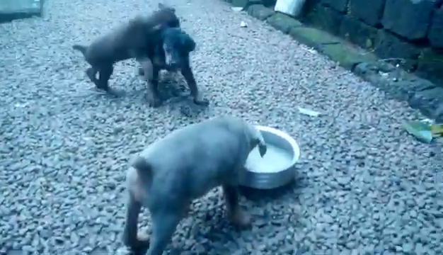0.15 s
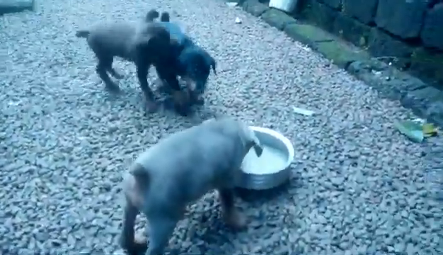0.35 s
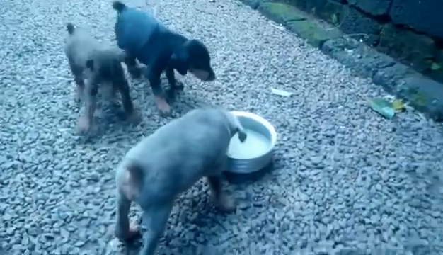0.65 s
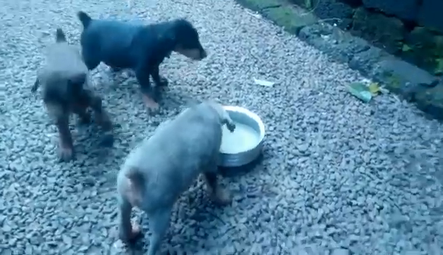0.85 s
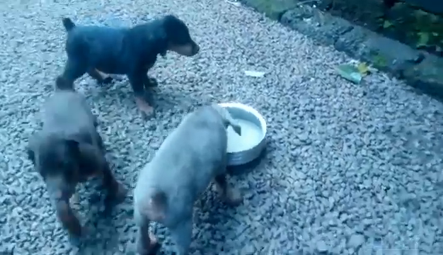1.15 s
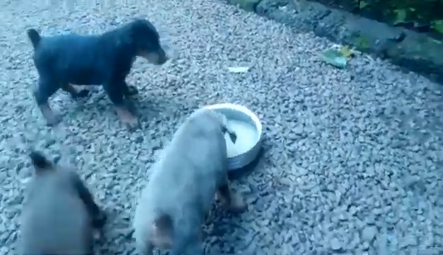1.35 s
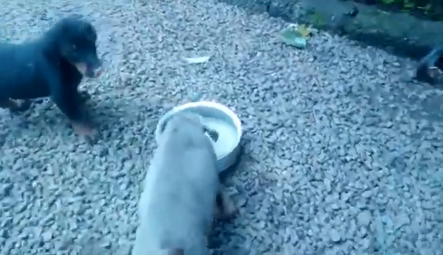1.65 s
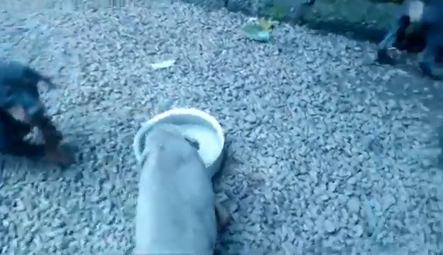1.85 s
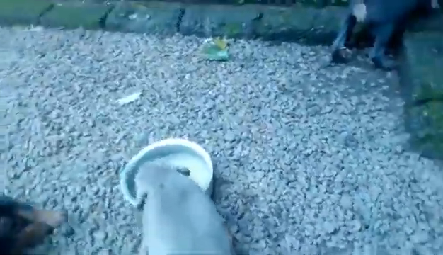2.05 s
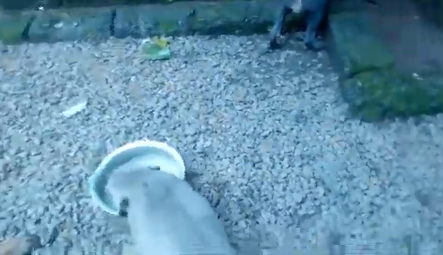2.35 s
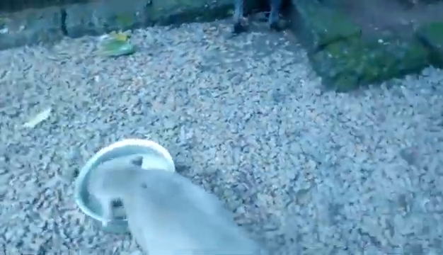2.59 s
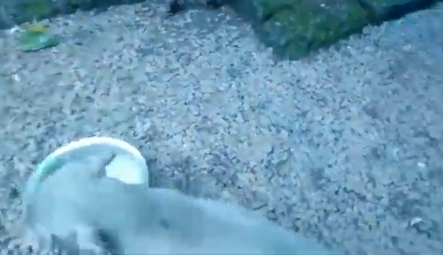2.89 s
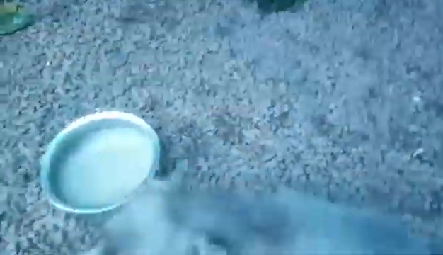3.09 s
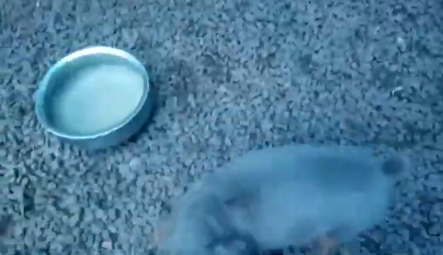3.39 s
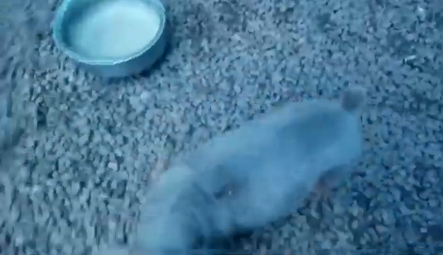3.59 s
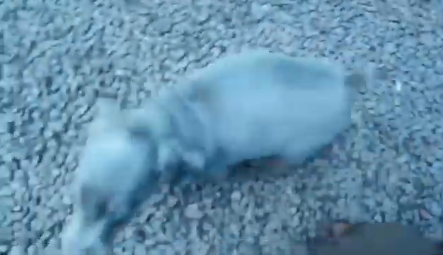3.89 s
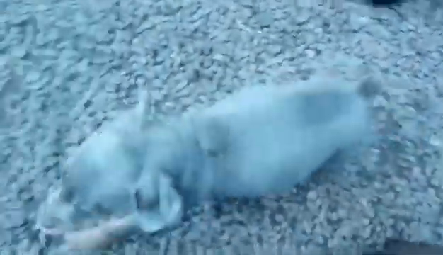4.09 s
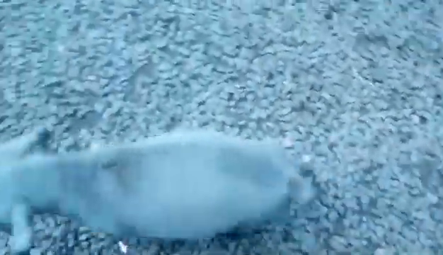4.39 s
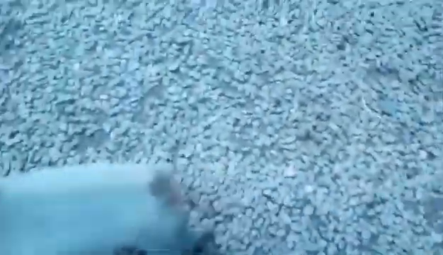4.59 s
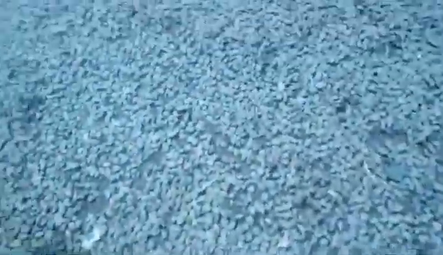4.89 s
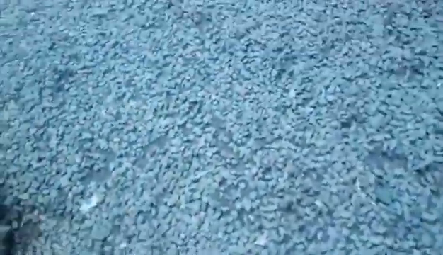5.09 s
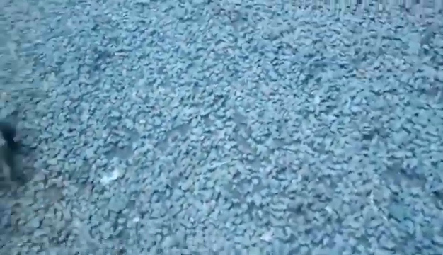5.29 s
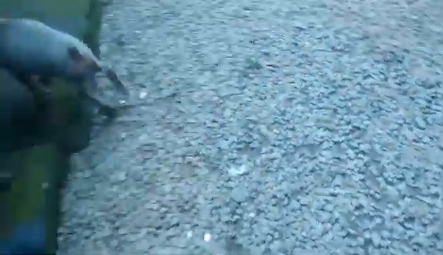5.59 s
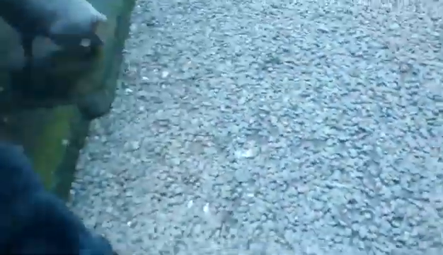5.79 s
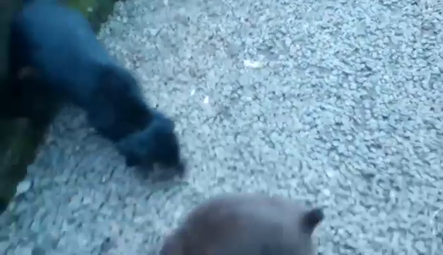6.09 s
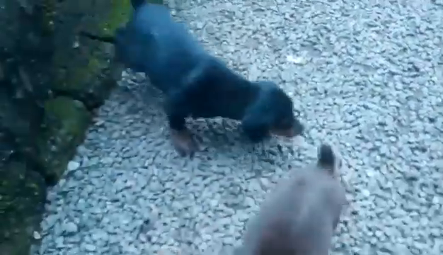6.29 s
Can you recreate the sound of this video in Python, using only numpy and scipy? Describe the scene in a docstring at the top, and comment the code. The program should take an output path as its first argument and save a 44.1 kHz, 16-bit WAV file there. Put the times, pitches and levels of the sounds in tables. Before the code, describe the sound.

In a small walled yard, a puppy cries over and over, sharp high yelps alternating with thin whimpers, and ends on a croaky falling whine. The voice sits left of the microphone with a brief echo. Throughout, gravel rubs, ticks and crunches quietly under shifting paws and shoes, busier from the middle on, with soft thudding steps. A barely audible hum and outdoor air lie behind.

```python
"""A puppy yelps again and again, off to the left in a small walled yard: sharp cries sliding into whines.
Its vocal folds sing a near-pure tone that cracks upward and turns rough as they beat unevenly.
Paws and shoes shuffle on gravel: small stones rub, click and crunch, and footfalls thud softly.
The walls throw the yelps back, over faint outdoor air and an unsteady hum."""
import sys
import numpy as np
from scipy import signal
from scipy.fft import rfft, irfft, next_fast_len
from scipy.io import wavfile

SR = 44100
rng = np.random.default_rng(int(sys.argv[2]) if len(sys.argv) > 2 else 0)


def inscribe(sig):
    """Save sig as 16-bit PCM at rate SR to the path in sys.argv[1].

    A 1-D sig is mono; a 2-D sig holds one channel per row.
    Samples are clipped to [-1, 1] before scaling.
    """
    pcm = np.round(np.clip(np.atleast_2d(sig).T, -1, 1) * 32767)
    wavfile.write(sys.argv[1], SR, pcm.astype(np.int16))


N = 284445
TIME = np.arange(N) / SR

# the bright tone colour of gravel: freq_hz, gain_db
GRAVEL_EQ = [(300, -41.5), (900, -19.5), (1500, -17), (3000, -17), (5000, -11), (7500, -5.5), (10300, -1.5),
             (11300, -11.5), (12000, -20.5), (14500, -23.5), (16000, -50)]


def puppy(direct_db=-1, echo_db=-11, scatter_db=-8, wall_db=-15, right_echo_db=2, right_lag_s=0.0002):
    """The yelps arrive straight, off the ground and two near walls, and as the yard's echo."""
    # loud cries, cued on the upward crack: crack_s, lead_s, attack_s, hold_s, start_hz, jump_hz, top_hz,
    # sag_hz_per_s, fall_hz_per_s, fundamental_db, second_db, overtone_db, tilt_db_per_octave, roughness
    cries = [(0.301, .058, 0.031, 0.096, 750, 29.6, 1002, 493, 4740, -12, -22, -16, 5.5, 0.32),
             (0.605, 0.071, .019, 0.095, 778, 50.4, 1005, 388, 3210, -6.5, -22.5, -13.5, -1, 0.09),
             (1.172, 0.061, 0.0055, .048, 676, 140.3, 980.5, 1614, 320, -11, -25, -25, -5, 1.06),
             (1.954, 0.048, 0.0017, 0.073, 676, 185, 1032, 1740, 299, -12, -27.5, -25.5, -15, 1),
             (2.891, 0.055, 0.0047, 0.074, 767, 92.2, 990, 1110, 890, -13, -24, -25, 0.5, 1.06),
             (3.129, 0.081, 0.019, 0.093, 799, 124.7, 971.4, 599, 2630, -10, -20.5, -21.5, -3, 0.43),
             (3.659, .063, 0.017, 0.085, 714, 147.7, 993.5, 1328, 710, -16.5, -25.5, -24.5, 11, 1.05),
             (4.373, 0.044, 0.0055, 0.083, 764, 109, 1003, 974, 500, -13, -28.5, -24.5, 4, 0.84),
             (4.939, 0.053, 0.0089, 0.084, 818, 66, 987.4, 750, 197, -13.5, -25, -22, 2, 0.63),
             (5.467, 0.051, 0.013, 0.087, 800, 73.8, 993, 647, 903, -10, -22, -17.5, 0.5, 0.27),
             (6.027, 0.06, 0.018, 0.061, 766, 69.2, 974, 651, 727, -9, -25.5, -19.5, 1.5, 0.33)]
    # softer whines between and after them: start_s, length_s, first_hz, last_hz, arch_hz,
    # fundamental_db, second_db, overtone_db, tilt_db_per_octave, croak (0-1)
    whines = [(0.770, 0.08, 800, 766, -2.5, -49, -46, -39.5, 0, 0),
              (0.836, 0.077, 779, 754.5, 10, -32, -40.5, -22.5, 20, 0.13),
              (1.265, .075, 855, 833, -1.5, -33, -41, -46.5, -14, 0.1),
              (1.332, 0.16, 844, 849.2, 85.5, -5, -35.5, -31, -7, 0.51),
              (1.562, 0.15, 793.3, 785, 2, -22.5, -37, -40, 3, 0.12),
              (2.117, 0.084, 786, 807, 5, -31.5, -30, -30, -7, 0.43),
              (2.166, 0.12, 780.5, 807, 48, -13, -32.5, -34.5, 0, 0.23),
              (2.295, .1, 799, 775, -9.5, -20, -40, -44, -44, 0),
              (2.408, 0.19, 783.7, 771, 15, -23, -35.5, -38, -30, 0.23),
              (2.575, 0.064, 755.4, 750, 6.5, -38, -35, -38.5, 22.5, 0),
              (3.246, 0.13, 805, 750, 9, -25, -37.5, -29.5, -7, 0),
              (3.785, 0.13, 779, 790, -7, -29.5, -41, -33, -5, 0),
              (3.884, 0.23, 821.6, 772, 32.5, -26, -26.5, -27, 12, 0.75),
              (4.524, 0.18, 817, 766, 10.5, -36, -45.5, -47, 19, 0.77),
              (5.095, 0.097, 862.5, 819, 5, -25.5, -49, -64, -2, 0.2),
              (5.638, 0.16, 823, 769, 4, -31.5, -50, -48, -3, 0.44),
              (6.166, 0.17, 811, 693, 2, -27.5, -45, -47.5, 13, 1)]
    # shading of the voice on the far, right side: freq_hz, gain_db
    far_side_eq = [(800, -19.5), (1100, -16), (1800, -8.5), (3000, -7), (6000, -11.5)]
    voice = np.zeros(N)
    for row in cries:
        add(voice, *cry(*row))
    for row in whines:
        add(voice, *whine(*row))
    echo = amp(echo_db) * yard(voice) + amp(scatter_db) * ground_scatter(voice)
    # the gliding pitch beats with its own reflections
    for channel, delays_s in enumerate([(0.023, 0.047), (0.0068, 0.066)]):
        for delay_s in delays_s:
            add(echo[channel], delay_s, amp(wall_db) * voice)
    direct = amp(direct_db) * colour(voice, [(1100, 0), (2500, -4)])
    late = np.interp(TIME - right_lag_s, TIME, direct)
    right = colour(late + amp(right_echo_db) * echo[1], far_side_eq)
    return np.array([direct + echo[0], right])


def cry(crack_s, lead_s, attack_s, hold_s, start_hz, jump_hz, top_hz, sag_hz_per_s, fall_hz_per_s,
        fundamental_db, second_db, overtone_db, tilt, roughness):
    """A cry swells and climbs, cracks up to its top pitch, sags while held, then falls away."""
    jump_s, opening_s, rest_hz = 0.0141, 0.045, 750
    crack_onset_s, crack_heal_s = 0.024, 0.07
    release_db_per_s, upper_release_db_per_s, overtone_fade_db_per_s = 362, 245, 49.5
    t = np.arange(round(0.42 * SR)) / SR - lead_s  # zero at the crack
    held, released = np.maximum(t, 0), np.maximum(t - hold_s, 0)
    before_jump = 1 - np.clip(t / jump_s, 0, 1)
    climb_hz = (top_hz - jump_hz - start_hz) * np.maximum(-t / lead_s, 0) ** 1.4  # still to climb
    falling_hz = np.maximum(top_hz - sag_hz_per_s * held - fall_hz_per_s * released, rest_hz)
    hz = falling_hz - jump_hz * before_jump - climb_hz
    crack = roughness * np.exp(-(t / np.where(t < 0, crack_onset_s, crack_heal_s)) ** 2)
    swell_db = -24 * np.exp(-(t + lead_s) / attack_s)
    upper_db = swell_db - upper_release_db_per_s * released
    duck_db = -6.5 * before_jump  # the lowest two harmonics leap out with the jump
    effort_db = 3.5 * (np.sin(np.pi * np.minimum(held / hold_s, 1) ** 0.7) - 0.5)
    # the fundamental is weak while the pitch is still below the mouth's resonance
    fundamental_db += swell_db + duck_db + effort_db - 0.19 * climb_hz - release_db_per_s * released
    second_db += upper_db + duck_db
    # the crack throws extra power into the overtones
    overtone_db += upper_db - overtone_fade_db_per_s * held + 4.5 * crack + 0.5 * before_jump
    # they brighten in the crack and as the mouth opens
    tilt += 8.5 * crack - 11.5 * np.exp(-(t + lead_s) / opening_s)
    return crack_s - lead_s, folds(crack_s - lead_s, hz, fundamental_db, second_db, overtone_db, tilt, crack)


def whine(start_s, length_s, first_hz, last_hz, arch_hz,
          fundamental_db, second_db, overtone_db, tilt, croak):
    """A whine glides through one shallow arch and may end in a croak, where the slack folds drop in pitch."""
    attack_s, release_db_per_s = 0.0067, 571
    croak_s, croak_drop_hz = 0.048, 35
    t = np.arange(round(0.42 * SR)) / SR
    progress = np.minimum(t / length_s, 1)
    hz = first_hz + (last_hz - first_hz) * progress + arch_hz * np.sin(np.pi * progress)
    fade_db = -21 * np.exp(-t / attack_s) - release_db_per_s * np.maximum(t - length_s, 0)
    crack = croak * np.exp(-((t - length_s) / croak_s) ** 2)
    fundamental_db += fade_db + 0.24 * (hz - hz.max())  # weaker as the pitch sinks from its top
    return start_s, folds(start_s, hz - croak_drop_hz * crack, fundamental_db,
                          second_db + fade_db, overtone_db + fade_db, tilt, crack)


def folds(start_s, hz, fundamental_db, second_db, overtone_db, tilt, crack):
    """The vocal folds: a near-pure tone with wavering overtones, torn by uneven cycles where it cracks."""
    # moments when the folds beat strong-weak: centre_s, length_s, depth_db
    splits = [(0.602, 0.051, -43), (0.954, 0.017, 6), (1.16, 0.031, 0), (3.222, 0.059, -12.5),
              (4.128, 0.047, -20)]
    # resonance of throat and mouth: freq_hz, gain_db
    throat_eq = [(2100, -4.5), (2400, -0.5), (2900, 3), (3300, -3.5), (3800, -2.5), (4300, -8.5),
                 (4800, -14.5), (5600, -24.5), (7500, -37.5), (10000, -31)]
    jitter, shimmer, flicker_db, rasp_db = 0.0251, 0.42, 4.5, -7
    hoarseness, loud_db = 0.14, -20.5
    t = start_s + np.arange(len(hz)) / SR
    # loud stretches are a little hoarse, cracks very much so
    rough = abs(hoarseness * np.sqrt(amp(overtone_db - loud_db)) + crack)
    # strained folds beat unevenly, in period and in strength
    hz = hz * (1 + 0.0045 * wander(len(t), 35))
    phase = 2 * np.pi * np.cumsum(hz * (1 + jitter * rough * wander(len(t), 100))) / SR
    strength = np.exp(shimmer * rough * wander(len(t), 48.7))
    # lip shape tilts the overtones, in dB per octave
    orders = np.arange(3, 12)[:, None]
    throat = amp(read(throat_eq, orders * hz) + tilt * np.log2(np.minimum(orders, 4.3)))
    throat /= np.linalg.norm(throat, axis=0)
    # the shape of each cycle varies, so every overtone flickers and smears by itself
    flicker = np.array([unit(amp(flicker_db * wander(len(t), 26))) for _ in orders])
    smear = (0.08 + 1.05 * rough) * np.array([wander(len(t), 110) for _ in orders])
    overtones = amp(overtone_db) * (throat * flicker * np.sin(orders * phase + smear)).sum(0)
    upper = amp(second_db) * np.sin(2 * phase + smear[-1] / 3) + overtones
    # alternate strong and weak cycles put tones halfway between the harmonics
    split = sum(amp(db) * np.exp(-(2 * (t - centre_s) / length_s) ** 2) for centre_s, length_s, db in splits)
    halves = split * amp(fundamental_db) * np.sin(1.5 * phase + smear[-2] / 2)
    halves += np.minimum(split, 0.5) * upper * np.cos(phase / 2)
    tone = np.sqrt(2) * (amp(fundamental_db) * np.sin(phase) + upper + halves)
    # air rushes through the folds once a cycle
    puffs = rng.standard_normal(len(t)) * (1 + 0.6 * np.cos(phase))
    rasp = unit(colour(puffs, [(500, -29), (900, -15.5), (1550, 0.5)] + throat_eq))
    voice = strength * tone + amp(overtone_db + rasp_db) * np.sqrt(rough) * rasp
    # so small a throat radiates less below its pitch
    return colour(voice * signal.windows.tukey(len(t), 0.03), [(450, -4), (720, -2)])


def gravel(grains_per_s=950, spread_db=4.8, tick_s=0.0008, hiss_db=-9, clump_db=4, level_db=1):
    """Countless small stones rub and tick, in clumps, as feet shift."""
    tick_kinds = 24
    t = np.arange(200) / SR
    sizes = amp(spread_db * np.minimum(rng.exponential(1, N), 4))
    grains = sizes * (rng.random(N) < grains_per_s / SR)
    kind = rng.integers(0, tick_kinds, N)
    ticks = np.zeros((2, N))
    for k in range(tick_kinds):
        tick = rng.standard_normal((2, len(t))) * np.exp(-t / tick_s)
        ticks += signal.oaconvolve((grains * (kind == k))[None], tick, axes=1)[:, :N]
    hiss = amp(hiss_db) * rng.standard_normal((2, N))
    grit = unit(colour(unit(ticks) + hiss, GRAVEL_EQ))
    effort = shuffling() * unit(amp(clump_db * wander(N, 31)))
    return pan(grit * effort * amp(level_db), right_db=-5)


def shuffling(attack_s=0.011, ease_db_per_s=6, settle_db_per_s=225.5, bed_db=-51):
    """The gravel's envelope: each scuff bites, eases as the foot slides and settles into a restless bed."""
    # feet pushing through the gravel: start_s, length_s, level_db
    scuffs = [(0.0, 0.02, -30.5), (0.043, 0.055, -29.5), (0.195, .2, -36), (0.502, 0.017, -31.5),
              (0.603, 0.041, -39.5), (0.905, 0.12, -45), (1.068, 0.14, -43.5), (1.276, 0.086, -33.5),
              (1.454, 0.024, -31.5), (1.621, .05, -31.5), (1.923, 0.31, -31.5), (2.339, 0.071, -38.5),
              (2.487, 0.16, -43.5), (2.639, 0.042, -32), (2.745, 0.29, -31), (2.781, 0.056, -26),
              (3.057, 0.2, -35.5), (3.25, .15, -34.5), (3.484, 0.083, -35.5), (3.663, 0.045, -37),
              (3.779, 0.094, -30), (3.88, 0.08, -35.5), (4.05, 0.28, -36.5), (4.148, 0.015, -30),
              (4.355, 0.31, -39.5), (4.73, 0.012, -41), (4.87, 0.25, -38.5), (5.198, 0.038, -38),
              (5.448, 0.43, -35.5), (5.892, 0.22, -40), (6.149, 0.74, -35.5)]
    power, t = np.full(N, amp(bed_db) ** 2), np.arange(SR) / SR
    for start_s, length_s, db in scuffs:
        level_db = db - ease_db_per_s * t - settle_db_per_s * np.maximum(t - length_s, 0)
        add(power, start_s, (np.minimum(t / attack_s, 1) * amp(level_db)) ** 2)
    return np.sqrt(power)


def stones(gain_db=3, contact_s=0.0012):
    """A stone grates on another for a millisecond or two and rings at its own pitch."""
    # bright clicks of single stones: start_s, level_db, pitch_hz
    clicks = [(0.0525, -32, 10400), (1.0863, -29, 7800), (1.6482, -16.5, 8850), (1.683, -13.5, 8400),
              (2.6476, -22.5, 11220), (2.7347, -21, 10600), (2.784, -14.5, 10460), (2.827, -18, 10420),
              (2.997, -13, 9050), (3.4626, -17.5, 8000), (3.5484, -33, 10200), (3.8027, -14, 10700),
              (3.92, -16.5, 10440), (4.0632, -12.5, 10000), (4.1428, -17.5, 11300), (4.2552, -13.5, 9650),
              (4.4284, -15.5, 9900), (4.766, -23, 9600), (4.8332, -15.5, 8800), (5.5034, -11.5, 9660),
              (6.3083, -18, 10900)]
    # duller knocks: start_s, level_db, pitch_hz
    knocks = [(2.501, -25.5, 2740), (4.835, -36, 2720), (5.215, -24, 1800)]
    out, t = np.zeros((2, N)), np.arange(700) / SR
    for start_s, db, hz in list(clicks) + knocks:
        burst = rng.standard_normal((2, len(t))) * t * np.exp(-t / contact_s)
        ring_eq = [(hz / 3, -12), (hz * 0.8, -7), (hz, 0), (hz * 1.25, -5), (hz * 3, -46)]
        click = colour(colour(burst, GRAVEL_EQ), ring_eq)
        add(out, start_s, amp(db + gain_db) * click / abs(click).max(1, keepdims=True))
    return pan(out, right_db=-5)


def crunches(fade_s=0.0062):
    """Stones squeezed together give way in a brief burst that reaches the highest treble."""
    # sharp crunches under a foot: start_s, level_db
    hits = [(1.294, -20.5), (1.339, -13.5), (3.094, -15.5), (3.101, -8), (3.109, -18)]
    out, t = np.zeros((2, N)), np.arange(2000) / SR
    for start_s, db in hits:
        burst = rng.standard_normal((2, len(t))) * np.exp(-t / fade_s)
        crunch = colour(burst, [(2000, -4), (11000, 13), (15000, -3)])
        add(out, start_s, amp(db) * crunch / abs(crunch).max())
    return pan(out, right_db=-3)


def steps(gain_db=4, attack_s=0.00036, fade_s=0.039):
    """Each footfall pushes a soft, low thud out of the gravel bed."""
    # footfalls: start_s, level_db
    footfalls = [(0.145, -35.5), (0.66, -43.5), (1.338, -49), (2.262, -38.5), (2.357, -42), (2.594, -40),
                 (2.872, -40), (3.105, -37), (4.192, -41.5), (5.077, -49), (5.549, -34)]
    # the dull body of a thud: freq_hz, gain_db
    thud_eq = [(30, -29), (110, -11.5), (280, -8.5), (500, -17.5), (900, -12), (3000, -40)]
    out, t = np.zeros(N), np.arange(SR // 5) / SR
    envelope = (1 - np.exp(-t / attack_s)) * np.exp(-t / fade_s)
    for start_s, db in footfalls:
        thud = colour(rng.standard_normal(len(t)), thud_eq) * envelope
        add(out, start_s, amp(db + gain_db) * thud / abs(thud).max())
    return pan(out, right_db=-16)


def ground_scatter(x, fade_s=0.006):
    """Rough ground scatters the overtones for a few milliseconds, so they flare and fade as they glide."""
    t = np.arange(SR // 20) / SR
    spray = colour(rng.standard_normal((2, len(t))) * np.exp(-t / fade_s), [(1050, -20), (1700, 0)])
    return signal.fftconvolve(x[None], spray / np.linalg.norm(spray[0]), axes=1)[:, :N]


def yard(x, echoes_per_s=3000, build_s=0.0017):
    """Diffuse echo of stone walls, different on each side; treble dies first."""
    # the yard's reverb time: freq_hz, t60_s
    decay_times = [(700, 0.45), (970, 0.49), (1400, 0.46), (4000, 0.4), (10000, 0.27)]
    taps = rng.standard_normal((2, SR)) * (rng.random((2, SR)) < echoes_per_s / SR)
    hz, t, spectrum = signal.stft(taps, SR, nperseg=256)
    envelope = amp(-60 * t / read(decay_times, hz)[:, None]) * (1 - np.exp(-t / build_s))
    tail = signal.istft(spectrum * envelope, SR, nperseg=256)[1]
    return signal.fftconvolve(np.atleast_2d(x), tail / np.linalg.norm(tail[0]), axes=1)[:, :N]


def air(level_db=-58):
    """The still air of the yard: a faint, low wash of noise."""
    # tone colour of the outdoor air: freq_hz, gain_db
    air_eq = [(20, -6), (55, 1.5), (95, 4), (140, 2), (300, -8), (600, -8.5), (2000, -10.5), (10000, -66),
              (16000, -38.5)]
    return pan(amp(level_db) * unit(colour(rng.standard_normal((2, N)), air_eq)), right_db=-5)


def hum(pitch_hz=98, level_db=-63, swell_db=7, peak_s=2.7, width_s=0.71):
    """A faint hum, unsteady in pitch and level, that swells midway."""
    swell = np.exp(-((TIME - peak_s) / width_s) ** 2)
    level = amp(level_db + swell_db * swell) * (1 + wander(N, 3.5) / 2)
    phase = 2 * np.pi * np.cumsum(pitch_hz + wander(N, 4.9)) / SR
    return pan(np.sqrt(2) * np.sin(phase) * level, right_db=-14)


def amp(db):
    """Decibels to gain."""
    return 10 ** (np.asarray(db) / 20)


def pan(x, right_db):
    """Leans a sound to the left by turning down the right channel."""
    return x * amp([[0], [right_db]])


def unit(x):
    """Scales to an rms of 1."""
    return x / np.sqrt(np.mean(x ** 2) + 1e-20)


def read(points, hz):
    """Reads a table on a logarithmic frequency axis."""
    f, value = np.transpose(points)
    return np.interp(np.log(hz + 1), np.log(f + 1), value)


def colour(x, points):
    """Equalises by a table of freq_hz, gain_db."""
    size = next_fast_len(x.shape[-1] + 512)
    gain = amp(read(points, np.fft.rfftfreq(size, 1 / SR)))
    return irfft(rfft(x, size) * gain, size)[..., :x.shape[-1]]


def wander(size, hz):
    """Random drift of rms 1, no faster than about hz."""
    padded = next_fast_len(2 * size)
    f = np.fft.rfftfreq(padded, 1 / SR)
    return unit(irfft(rfft(rng.standard_normal(padded)) / (1 + (f / hz) ** 2))[:size])


def add(mix, start_s, sound):
    """Adds a sound to the mix at start_s."""
    part = mix[..., max(round(start_s * SR), 0):][..., :sound.shape[-1]]
    part += sound[..., :part.shape[-1]]


def scene():
    """The puppy in front, the gravel underfoot with its echo, and air and hum behind."""
    ground = gravel() + stones() + crunches() + steps()
    return puppy() + ground + amp(-9) * yard(ground) + air() + hum()


def record(dry):
    """A steep low-pass trims the treble above 16 kHz."""
    lowpass = signal.firwin(511, 16000, window=("kaiser", 9), fs=SR)
    return signal.oaconvolve(dry, lowpass[None], "same")


dry = scene()
out = record(dry)
inscribe(out)
```